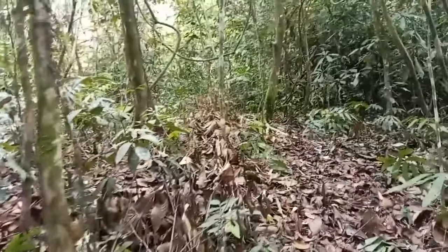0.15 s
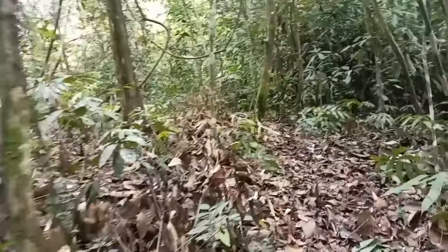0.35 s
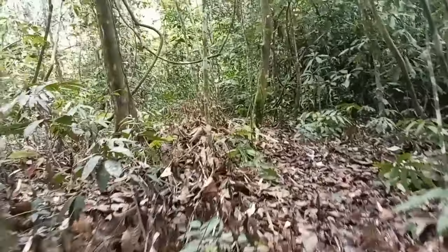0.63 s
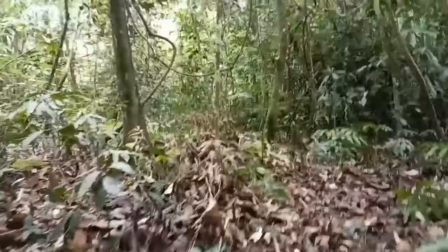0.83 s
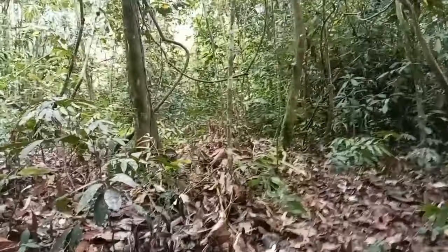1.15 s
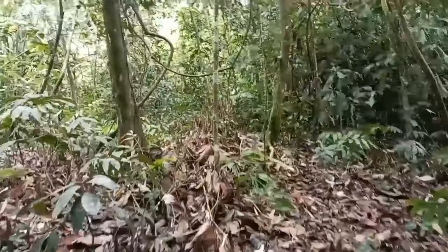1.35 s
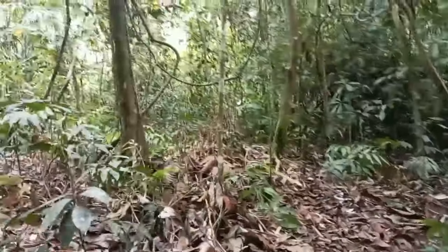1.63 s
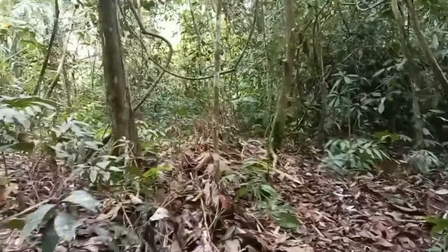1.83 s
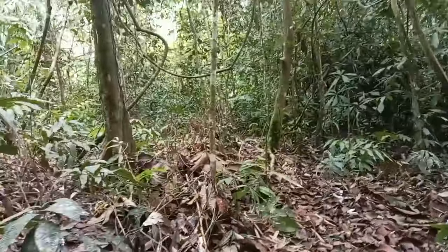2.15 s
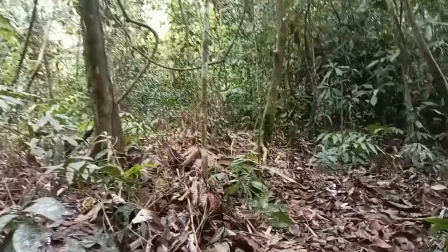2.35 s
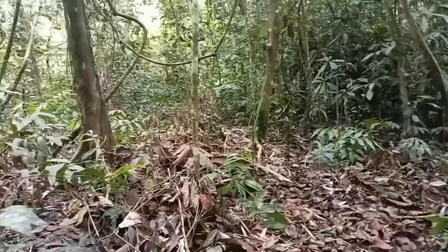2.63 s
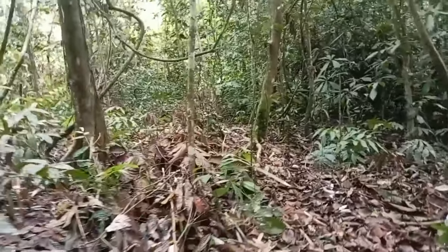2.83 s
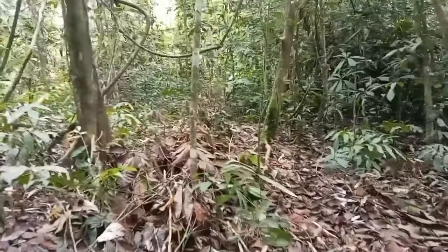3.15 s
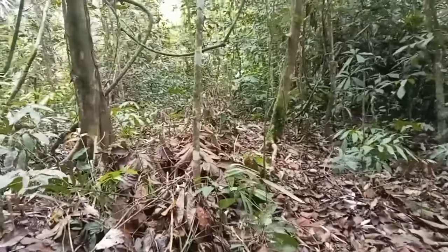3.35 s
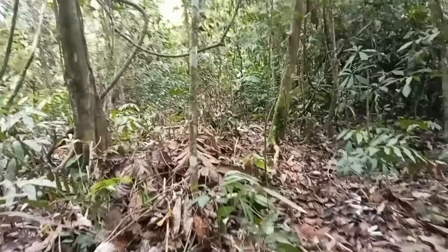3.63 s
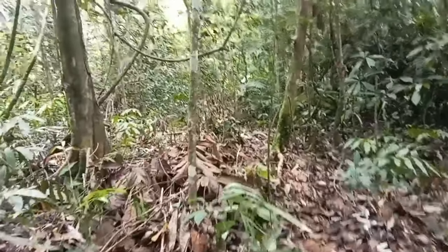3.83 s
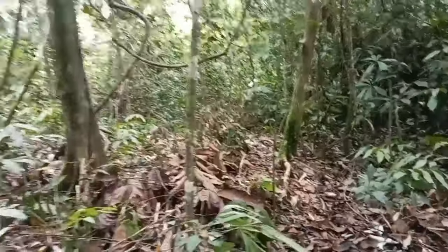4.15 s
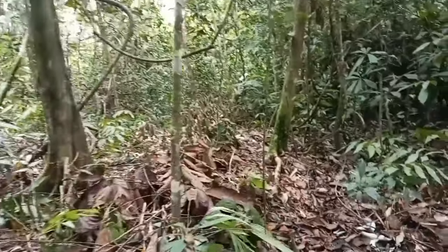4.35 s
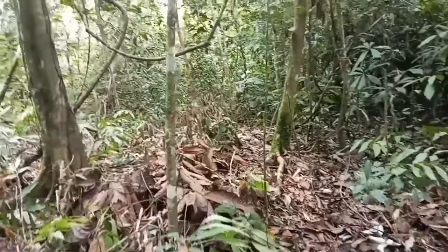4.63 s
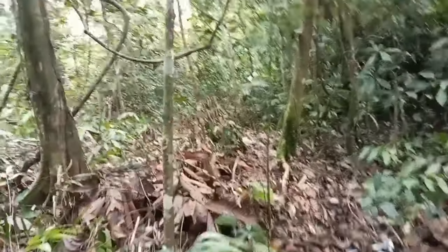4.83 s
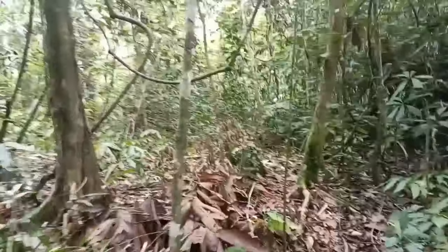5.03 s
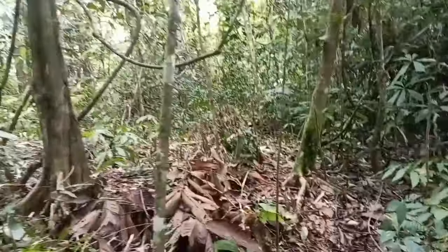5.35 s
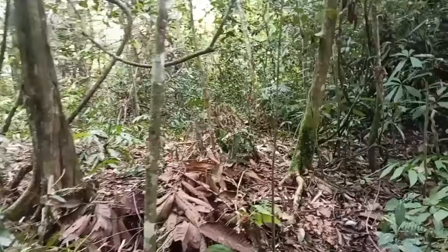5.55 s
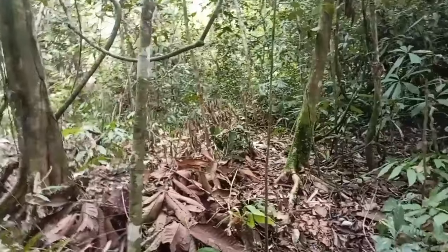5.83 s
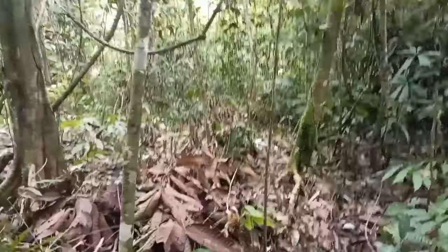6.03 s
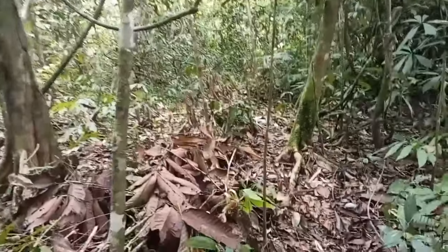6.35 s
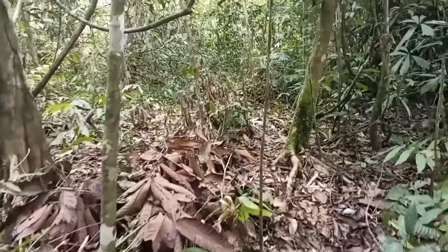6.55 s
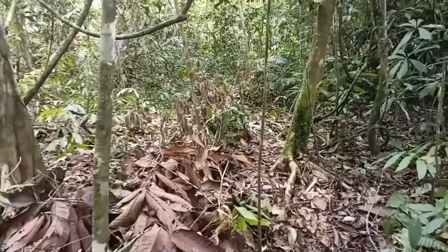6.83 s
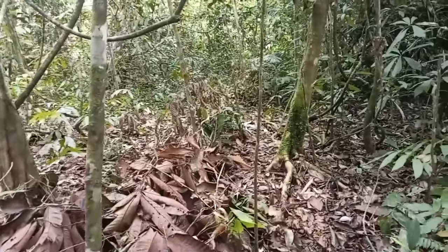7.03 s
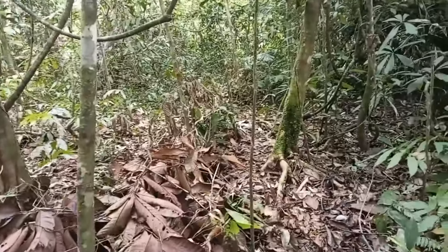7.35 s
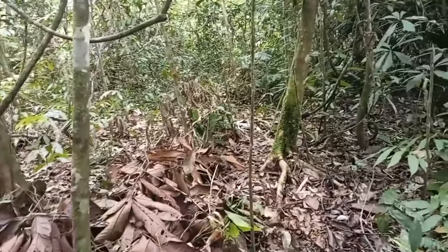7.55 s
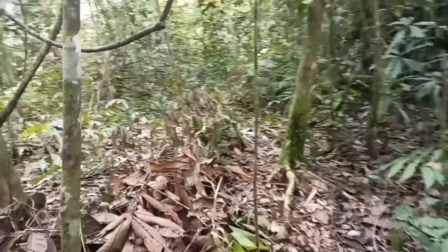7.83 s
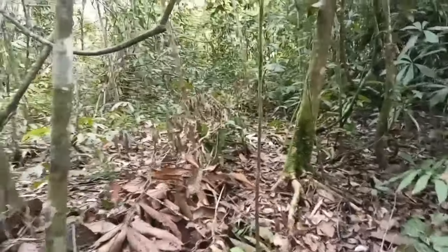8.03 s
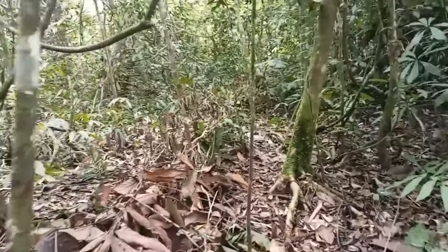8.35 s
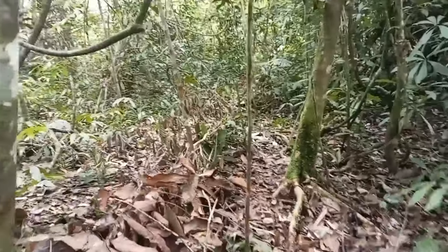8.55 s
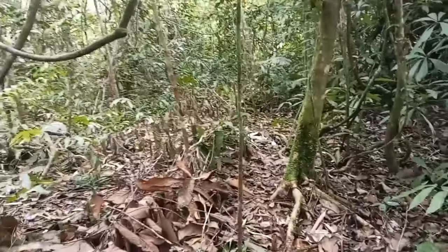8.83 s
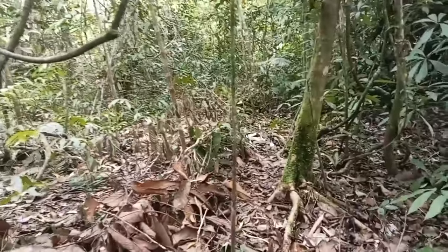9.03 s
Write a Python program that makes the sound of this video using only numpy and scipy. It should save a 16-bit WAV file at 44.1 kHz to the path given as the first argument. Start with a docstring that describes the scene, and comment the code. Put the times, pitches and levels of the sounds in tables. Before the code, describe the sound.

Someone walks slowly through a tropical forest, dry leaves crunching and twigs snapping close to the microphone. The steps are loudest in the first two seconds, with a few hollow knocks on wood, then turn lighter and sparser. Cicadas hold a shrill, steady drone throughout. One bird repeats a short rising warble while others whistle and hoot, echoing among the trees. Far off, a slow engine thuds softly. The sound is mono.

```python
"""Dry leaves crunch over a steady drone of cicadas: a slow walk in a tropical forest, heard in mono.
Each step breaks leaves in many tiny clicks; twigs snap and buried wood knocks underfoot.
One bird repeats a short rising warble, while others whistle, slur and hoot, echoing among the trees.
The cicadas' countless clicks blur into one shrill sound, and other insects buzz now and then.
Far off, a slow one-cylinder engine thuds once for each firing, in a soft wash of forest air."""
import sys
import numpy as np
from scipy import signal
from scipy.io import wavfile
from scipy.ndimage import map_coordinates

SR = 44100
rng = np.random.default_rng(int(sys.argv[2]) if len(sys.argv) > 2 else 0)


def dump(signal):
    """Clip the signal to [-1, 1] and save it as 16-bit WAV at the path in sys.argv[1]."""
    limited = np.clip(np.atleast_2d(signal).T, -1, 1)
    pcm = np.round(limited * 32767).astype(np.int16)
    wavfile.write(sys.argv[1], SR, pcm)


N = 405499
TIME = np.arange(N) / SR


# a foot presses on the leaves: t/s at full weight, rise/s, hold/s, crush level/dB, crisp level/dB
FOOT_PRESSES = [(0.276, 0.047, 0.095, -48, -57), (0.367, 0.023, 0.1, -45.5, -52.5),
                (0.548, 0.037, .03, -42, -49.5), (0.72, 0.015, 0.029, -39, -51),
                (0.793, 0.022, 0.21, -55.5, -58.5), (1.318, 0.054, 0.022, -33, -36.5),
                (1.388, .05, 0.13, -36.5, -38.5), (1.536, 0.018, .055, -38.5, -44),
                (1.667, .03, 0.073, -44.5, -54.5), (1.78, 0.042, 0.25, -55.5, -63.5),
                (2.376, 0.036, 0.024, -50.5, -61), (2.874, 0.16, 0.16, -51.5, -61),
                (3.146, .03, 0.036, -51.5, -68), (3.867, .04, 0.022, -52, -70),
                (4.929, 0.16, 0.03, -45.5, -54), (5.002, 0.022, 0.1, -50.5, -63),
                (5.832, 0.12, 0.055, -43.5, -57), (5.91, .03, 0.088, -50, -57.5),
                (7.859, .004, .008, -44, -67), (7.893, 0.0052, 0.0091, -42.5, -55),
                (8.69, .06, .04, -58, -70)]

def footsteps(release_s=0.031, clump_db=2.2, settling_db=-65):
    """A sole crushes leaf after leaf; thin edges crackle crisply, and bent leaves rustle back."""
    crush = crackle(per_s=3200, spread_db=3.3, lo_hz=290, hi_hz=5000, cycles=1.8)
    crisp = crackle(per_s=2600, spread_db=1.6, lo_hz=6500, hi_hz=14800, cycles=0.7)
    settling = crackle(per_s=2400, spread_db=2.0, lo_hz=1274, hi_hz=10600, cycles=1.7)
    crush = evened(band(crush, 8800, "low") * gain_of(clump_db * wander(N, 130)))
    crisp = evened(band(crisp, 3000, "high") * gain_of(clump_db * wander(N, 130)))
    settling *= gain_of(settling_db + 3 * wander(N, 4))
    crush_power, crisp_power = np.zeros((2, N))
    for s, rise_s, hold_s, crush_db, crisp_db in FOOT_PRESSES:
        landing = 2 * (s - TIME) / rise_s
        lifting = (TIME - s - hold_s) / release_s
        weight = np.exp(-np.clip(np.maximum(landing, lifting), 0, 20))  # rises, holds at 1, dies away
        crush_power += (weight * gain_of(crush_db)) ** 2
        crisp_power += (weight * gain_of(crisp_db)) ** 2
    return crush * np.sqrt(crush_power) + crisp * np.sqrt(crisp_power) + settling


# the common tone of the crackles and snaps, from low to high: f/Hz, relative level/dB
CRACKLE_TONE = [(100, -14), (300, -4), (900, -5.5), (1800, -0.5), (2700, -3), (3900, 0.5), (5200, -8.5),
                (6300, -7.5), (8000, -20.5), (9600, -8.5), (12500, -14.5), (15500, -19.5)]

def crackle(per_s, spread_db, lo_hz, hi_hz, cycles, leaves=16):
    """Tiny breaks of uneven size each make one leaf ring for a few cycles."""
    breaks = rng.random(N) < per_s / SR
    size = np.minimum(rng.exponential(1, N), 4)
    leaf = rng.integers(0, leaves, N)
    clicks = breaks * gain_of(spread_db * size) * rng.choice([-1, 1], N)
    out = np.zeros(N)
    for k, hz in enumerate(np.geomspace(lo_hz, hi_hz, leaves)):
        decay = np.exp(-hz / (cycles * SR))
        ringing = [1, -2 * decay * np.cos(2 * np.pi * hz / SR), decay * decay]  # a filter that rings at hz
        out += (1 - decay) * signal.lfilter([1, 0, -1], ringing, clicks * (leaf == k) + 1e-12)
    return evened(colour(out, CRACKLE_TONE))


# twigs and stiff leaves break: t/s, peak level/dB before the boost, ring f/Hz, fizz/dB against the ring
TWIG_BREAKS = [(0.2488, -34, 3740, 16), (0.2839, -31, 2980, -4), (0.3903, -33, 3790, 6),
               (.4973, -29, 3600, -1), (0.7072, -22, 2020, -3), (0.71, -21.5, 1500, -0.5),
               (.723, -25, 2370, -9), (.7552, -20.5, 2400, 1), (0.762, -20, 2230, 1.5),
               (0.99, -32.5, 4130, -23), (1.047, -38, 3970, -18), (1.24, -37, 2060, -21),
               (1.3278, -27, 1590, 4), (1.4069, -21.5, 4440, -1), (1.4199, -15, 1870, -8),
               (1.504, -32, 3930, 0), (1.5843, -24, 2050, -2), (1.5963, -24, 2300, 2),
               (1.7199, -29, 1660, -5), (1.9751, -32.5, 1440, -10), (2.0513, -24.5, 3530, 0),
               (2.064, -28.5, 1910, 0), (3.4423, -33, 1350, -18), (3.9903, -28.5, 1710, -1.5),
               (3.9911, -21.5, 4200, 1), (4.3183, -40, 2700, -14), (4.9007, -34.5, 3650, -16),
               (5.016, -32, 3350, -10), (5.071, -33.5, 1660, 0), (5.301, -33, 2500, -2),
               (5.726, -31.5, 1610, -14), (6.72, -26, 3860, 8), (7.6768, -36, 5000, 18),
               (7.86, -34, 1820, -16), (7.9878, -39, 2294, 8), (8.5367, -32.5, 2440, 15),
               (9.057, -38, 3680, 0), (9.159, -38, 1520, -4)]

def snaps(ring_s=0.00065, crack_s=0.0008, fibres_s=0.0085, fibres_db=-17, boost_db=4.5):
    """A breaking twig rings very briefly, with a sharp crack and a short trail of tearing fibres."""
    out, t = np.zeros(N), np.arange(SR // 30) / SR
    for s, db, hz, fizz_db in TWIG_BREAKS:
        ring = np.sin(2 * np.pi * hz * t) * np.exp(-t / ring_s)
        tearing = np.exp(-t / crack_s) + gain_of(fibres_db) * np.exp(-t / fibres_s)
        fizz = gain_of(fizz_db) * rng.standard_normal(len(t)) * tearing
        snap = colour(ring + fizz, CRACKLE_TONE)
        add(out, s, gain_of(db + boost_db) * snap / abs(snap).max())
    return out


# a foot hits buried wood: t/s, level/dB before fading, f/Hz
WOOD_KNOCKS = [(0.387, -29, 428), (.503, -38, 423), (1.31, -32.5, 286), (1.545, -31, 413)]

def knocks(ring_s=0.004, rise_s=0.00078):
    """Wood under the leaves gives one low, hollow note that dies at once."""
    out, t = np.zeros(N), np.arange(SR // 8) / SR
    for s, db, hz in WOOD_KNOCKS:
        fade = np.exp(-t / ring_s) * (1 - np.exp(-t / rise_s))
        add(out, s, gain_of(db) * np.sin(2 * np.pi * hz * t) * fade)
    return out


# the main bird's calls: t/s, length/s, top f/Hz, climb/s, then level/dB of start, middle, end and echo
WARBLE_CALLS = [(0.923, 0.14, 2079, 0.013, -38.5, -31, -31.5, -41),
                (2.312, 0.14, 2360, 0.075, -33.5, -33, -52, -43),
                (3.532, 0.16, 2122, 0.02, -40.5, -41.5, -43, -41.5),
                (4.578, 0.11, 2370, 0.039, -40.5, -43, -47, -42.5),
                (5.722, 0.15, 2365, 0.047, -45, -51, -57, -44.5),
                (6.88, .125, 2067, 0.0056, -43.5, -36, -36, -39),
                (7.724, 0.16, 2410, 0.024, -44, -73, -38.5, -46.5),
                (8.469, 0.16, 2413, 0.022, -43.5, -76, -41.5, -47)]

def warbler(trill_hz=31.3, trill_depth_hz=125, trill_fade_s=0.14, attack_s=0.016, far_echo_db=-9):
    """A whistle starts low, climbs and drops back, with a fast wobble in pitch that fades."""
    open_hz, open_s, close_hz, close_s = 1870, 0.033, 2057, 0.0341
    out = np.zeros(N)
    for s, length, top_hz, climb_s, start_db, middle_db, end_db, echo_db in WARBLE_CALLS:
        t = np.arange(0, length, 1 / SR)
        n = len(t)
        climb = np.interp(t, [open_s, open_s + climb_s], [open_hz, top_hz])
        pitch = close_hz + (climb - close_hz) * np.minimum((length - t) / close_s, 1)
        beats = trill_hz * t + 0.06 * wander(n, 24.3)
        wobble = -trill_depth_hz * np.cos(2 * np.pi * beats) * np.exp(-t / trill_fade_s)
        hz = pitch + wobble + 22 * wander(n, 300)
        level = np.interp(t, [open_s, length / 2, length], [start_db, middle_db, end_db])
        level += 3.45 * wander(n, 160.6)
        fade = np.minimum(t / attack_s, 1) ** 2 * signal.windows.tukey(n, 0.06)
        add(out, s, gain_of(level) * evened(fade * sine(hz)))
        # the direct sound changes as the bird turns; the trees get the whole call evenly
        scattered = gain_of(echo_db) * evened(fade * sine(hz + 25 * wander(n, 392)))
        add(out, s, trees(scattered, echo_s=0.63, onset_s=0.0024))
        add(out, s, gain_of(far_echo_db) * trees(scattered, echo_s=1.63))
    return out


# a ladder of notes: t/s, length/s, f/Hz, bend/Hz, level/dB, swell over the note/dB
LADDER_NOTES = [(2.115, 0.16, 3475, -60, -53.5, 14), (2.299, 0.13, 3396, -28, -50, 0),
                (2.452, .14, 3765, 30, -46, 11), (2.615, 0.23, 4159, -11, -41.5, 1),
                (2.828, 0.082, 4093, 14, -40, 14), (2.937, 0.172, 4690, 79, -46.5, 9),
                (3.07, 0.22, 4425, -200, -49.5, -3), (3.103, 0.16, 5240, 40, -47, 14)]

def ladder_bird():
    """A bird whistles clean notes that step upward, each echoing on under the next."""
    out = np.zeros(N)
    for s, length, hz, bend_hz, db, swell_db in LADDER_NOTES:
        pitch = glide(length, hz - bend_hz / 2, hz + bend_hz / 2)
        add(out, s, whistle(pitch, db, swell_db, quaver_hz=8, echo_db=-4, taper=0.35, flutter_db=1.8))
    return out


# falling calls: t/s, length/s, slide start f/Hz, slide end f/Hz, level/dB before the fade-in
SLUR_CALLS = [(3.503, 0.32, 5030, 3960, -50.5), (4.213, 0.16, 4750, 4680, -50),
              (4.559, 0.25, 5070, 3600, -49.5), (6.583, 0.24, 4200, 4220, -55),
              (7.082, .28, 4820, 4000, -47.5), (7.654, 0.2, 4405, 4410, -48),
              (8.012, .24, 4980, 3790, -49.5)]

def slurring_bird(start_hz=5750, drop_s=0.05, fade_in_s=0.055):
    """A whistle fades in at the cicadas' pitch, then drops quickly into a slower slide."""
    out = np.zeros(N)
    for s, length, slide_hz, end_hz, db in SLUR_CALLS:
        slide = glide(length, slide_hz, end_hz)
        drop = (start_hz - slide_hz) * np.exp(-TIME[:len(slide)] / drop_s)
        slur = whistle(slide + drop, db, swell_db=-3, quaver_hz=48, echo_db=-1, taper=0.3)
        add(out, s, slur * np.minimum(TIME[:len(slur)] / fade_in_s, 1))
    return out


# long, sagging whistles: t/s, length/s, level/dB
SAGGING_CALLS = [(0.771, .125, -52.5), (3.051, 0.46, -57.5), (5.496, 0.37, -57.5), (8.228, 0.53, -56.5)]
# soft, rising whistles: t/s, level/dB
RISING_CALLS = [(2.869, -61), (3.361, -59), (6.888, -54.5), (7.411, -58)]
# quick, hoarse chirps: t/s, length/s, start f/Hz, end f/Hz, level/dB
HOARSE_CHIRPS = [(4.476, 0.06, 3590, 3430, -62.5), (5.354, 0.046, 2920, 3600, -56),
                 (6.035, 0.15, 5060, 3540, -54.5), (7.359, 0.023, 4000, 3000, -50.5),
                 (8.072, 0.032, 3130, 3660, -54), (8.657, 0.062, 4720, 3840, -57.5)]

def far_birds():
    """Distant birds whistle and chirp, half lost in their echoes."""
    out = np.zeros(N)
    for s, length, db in SAGGING_CALLS:
        pitch = glide(length, from_hz=3025, to_hz=2890)
        add(out, s, whistle(pitch, db, swell_db=10.5, quaver_hz=54, echo_db=-1.5))
    for s, db in RISING_CALLS:
        pitch = glide(length_s=0.169, from_hz=2440, to_hz=2590)
        add(out, s, whistle(pitch, db, swell_db=0, quaver_hz=43.8, echo_db=-2))
    for s, length, from_hz, to_hz, db in HOARSE_CHIRPS:
        pitch = glide(length, from_hz, to_hz)
        add(out, s, whistle(pitch, db, swell_db=2, quaver_hz=230, echo_db=2.5))
    return out


# runs of faint hoots: t/s, length of the run/s, f/Hz, level/dB
HOOT_RUNS = [(.827, .42, 938, -61.5), (1.79, .14, 920, -62.5)]

def hoots(every_s=0.094, hoot_s=0.056, coo_at_s=4.998):
    """Birds deep in the forest give evenly spaced hoots and one low coo."""
    out = np.zeros(N)
    for start, length, hz, db in HOOT_RUNS:
        for s in np.arange(start, start + length, every_s):
            add(out, s, whistle(glide(hoot_s, hz, hz), db, swell_db=0, quaver_hz=3, echo_db=-9))
    coo_pitch = glide(length_s=0.3, from_hz=367, to_hz=367)
    add(out, coo_at_s, whistle(coo_pitch, db=-65, swell_db=-1, quaver_hz=5.2, echo_db=5))
    return out


def whistle(pitch, db, swell_db, quaver_hz, echo_db, taper=0.34, flutter_db=2.5):
    """One note of a far bird: it trembles in pitch and loudness and echoes in the trees."""
    n = len(pitch)
    level = np.linspace(0, swell_db, n) + flutter_db * wander(n, 74.6)
    shape = signal.windows.tukey(n, taper) * gain_of(level)
    note = gain_of(db) * evened(shape * sine(pitch + quaver_hz * wander(n, 263)))
    sound = gain_of(echo_db) * trees(note, echo_s=0.74)
    add(sound, 0, note)
    return sound


# the ring of cicada bodies, with a second peak an octave up: f/Hz, relative level/dB
CHORUS_TONE = [(4700, -29), (5150, -14), (5450, 1), (5750, 0), (6100, -0.5), (6350, -6), (6800, -9.5),
               (7700, -29.5), (9900, -48.5), (10900, -9.5), (11400, -25), (12200, -17), (13200, -19.5),
               (15500, -44)]
# the nearest cicadas, which stand out: f/Hz, width/Hz, level/dB
NEAR_CICADAS = [(5754, 225, -54), (5890, 47, -61.5), (6355, 92, -61), (11450, 280, -66)]

def cicadas(clicks_per_s=14000, chorus_db=-52, throb_db=0.88, drift_db=0.36, waver_hz=35):
    """Cicadas click tiny drum skins into one shrill drone; a few near bodies ring at their own pitch."""
    clicks = rng.standard_normal(N) * (rng.random(N) < clicks_per_s / SR)
    out = evened(colour(clicks, CHORUS_TONE)) * gain_of(chorus_db)
    for hz, width_hz, db in NEAR_CICADAS:
        turns = np.cumsum(hz + waver_hz * wander(N, 4)) / SR
        noise = rng.standard_normal(N) + 1j * rng.standard_normal(N)
        rasp = band(noise, width_hz / 2, "low")
        ring = (rasp * np.exp(2j * np.pi * turns)).real  # moves the rasp up to the cicada's pitch
        out += gain_of(db + 0.39 * wander(N, 6.1)) * evened(ring)
    return out * gain_of(throb_db * wander(N, 14) + drift_db * wander(N, 1.85))


# single insects: t/s, length/s, f/Hz, width/Hz, level/dB
INSECT_BUZZES = [(2.1, 1.15, 14900, 1400, -67), (3.74, 0.79, 7800, 160, -74), (4.103, 1.5, 8700, 227, -83),
                 (5.12, 0.55, 7720, 200, -72), (7.9, 1, 8760, 250, -78)]

def buzzes():
    """Thin, high insect buzzes fade in and out above the cicadas."""
    out = np.zeros(N)
    for s, length, hz, width_hz, db in INSECT_BUZZES:
        tone = sine(glide(length, hz, hz))
        rasp = band(rng.standard_normal(len(tone)), width_hz / 2, "low")
        fade = signal.windows.tukey(len(tone), 0.5)
        add(out, s, gain_of(db) * evened(rasp * tone * fade))
    return out


# how often the engine fires: t/s, rate/Hz
FIRING_RATE = [(0, 23.5), (2, 23.5), (3, 23.6), (3.6, 23.9), (4.3, 24.7), (5, 24.4), (6.3, 24.6),
               (7.4, 24.3), (9.19, 24.35)]
# the tone of one exhaust thud through the trees: f/Hz, relative level/dB
EXHAUST_TONE = [(24, -48), (48, -35), (73, -26), (98, -4.5), (122, 5), (146, 1.5), (170, 0), (195, -12.5),
                (222, -5.5), (246, -15), (272, -11), (325, -11.5), (420, -24.5), (900, -64)]
# the engine's deep boom grows: t/s, gain of the bass/dB
BOOM_GAIN = [(0.3, -60), (0.47, -56.5), (8.34, -46.5), (9.0, -48.5)]

def engine(boom_below_hz=193, upper_db=-49.5, uneven_db=0.06, puff_cycles=0.8, chuff_db=-67):
    """Each slightly uneven firing sends a thud and a puff of rough gas out of the exhaust."""
    cycles = np.cumsum(follow(FIRING_RATE)) / SR + 0.013 * wander(N, 20)
    count = np.floor(cycles)
    firings = np.diff(count, prepend=count[0]) * gain_of(uneven_db * wander(N, 25))
    thuds = evened(colour(firings, EXHAUST_TONE))
    boom = signal.sosfiltfilt(signal.butter(4, boom_below_hz, fs=SR, output="sos"), thuds)
    exhaust = gain_of(follow(BOOM_GAIN)) * boom + gain_of(upper_db) * (thuds - boom)
    puffs = rng.standard_normal(N) * np.exp(-(cycles % 1) / puff_cycles)
    chuff = evened(band(band(puffs, 280, "low"), 146, "high"))
    echo = gain_of(-17) * trees(exhaust, echo_s=0.22)[:N]
    return exhaust + gain_of(chuff_db) * chuff + echo


# the tone of far forest air: f/Hz, relative level/dB
AIR_TONE = [(20, -33), (33, -9), (52, -5.5), (110, 7), (200, 3), (350, -4.5), (600, -4), (1100, -15.5),
            (2200, -10), (3000, -23.5), (4800, -24), (8000, -47), (15000, -28)]

def air(level_db=-53.5, swell_db=0.7):
    """The far forest makes a soft wash of noise that wavers a little."""
    wash = evened(colour(rng.standard_normal(N), AIR_TONE))
    return wash * gain_of(level_db + swell_db * wander(N, 8.6))


def trees(x, echo_s, onset_s=0.0043):
    """Trunks and leaves scatter echoes that fall 60 dB in echo_s; the result is one second longer."""
    t = np.arange(SR) / SR
    bounces = rng.standard_normal(SR) * (rng.random(SR) < 0.1)
    bounces *= np.exp(-np.log(1000) * t / echo_s) * (1 - np.exp(-t / onset_s))
    echo = signal.fftconvolve(x, bounces)
    return echo * np.linalg.norm(x) / (np.linalg.norm(echo) + 1e-20)


def gain_of(db):
    """Turns decibels into a number to multiply by."""
    return 10 ** (np.asarray(db) / 20)


def evened(x):
    """Scales a sound to an average strength (rms) of 1."""
    return x / np.sqrt(np.mean(x ** 2) + 1e-20)


def follow(rows):
    """Joins (time, value) points with straight lines."""
    return np.interp(TIME, *np.transpose(rows))


def add(mix, s, sound):
    """Mixes a sound in at s seconds."""
    part = mix[max(round(s * SR), 0):][:len(sound)]
    part += sound[:len(part)]


def wander(n, per_s):
    """A smooth random curve of size about 1, with per_s new values a second."""
    at = np.arange(n) / SR * per_s
    return map_coordinates(rng.standard_normal(4096), [at], order=2, mode="wrap")


def colour(x, tone, size=8192):
    """Gives a sound the tone in a table; the filter rings after each click, never before."""
    tone_hz, tone_db = np.transpose(tone)
    hz = abs(np.fft.fftfreq(size, 1 / SR))
    db = np.interp(np.log(hz + 1), np.log(tone_hz + 1), tone_db)
    spectrum = np.exp(np.conj(signal.hilbert(np.log(gain_of(db)))))
    ring = np.fft.ifft(spectrum).real[:size // 2]
    return signal.oaconvolve(x, ring / np.linalg.norm(ring))[:len(x)]


def band(x, hz, kind):
    """Gently keeps what lies below ("low") or above ("high") hz."""
    return signal.sosfilt(signal.butter(2, hz, kind, fs=SR, output="sos"), x)


def sine(hz):
    """A pure tone that follows a pitch curve."""
    return np.sin(2 * np.pi * np.cumsum(hz) / SR)


def glide(length_s, from_hz, to_hz):
    """A straight slide from one pitch to another."""
    return np.linspace(from_hz, to_hz, int(length_s * SR))


def scene():
    """Near feet with a faint echo, among birds, insects and the engine; both channels are the same."""
    feet = footsteps() + snaps() + knocks()
    birds = warbler() + ladder_bird() + slurring_bird() + far_birds() + hoots()
    feet_echo = gain_of(-16) * trees(feet, echo_s=0.83)[:N]
    mono = feet + feet_echo + birds + cicadas() + buzzes() + engine() + air()
    return np.array([mono, mono])


def record(dry):
    """Cuts away the very highest treble, above 15600 Hz."""
    low_pass = signal.firwin(511, 15600, window=("kaiser", 9), fs=SR)
    return signal.oaconvolve(dry, low_pass[None], "same", axes=1)


dry = scene()
out = record(dry)
dump(out)
```